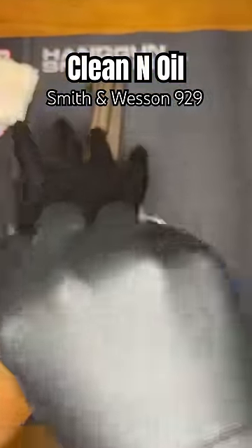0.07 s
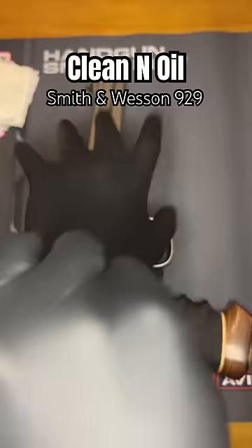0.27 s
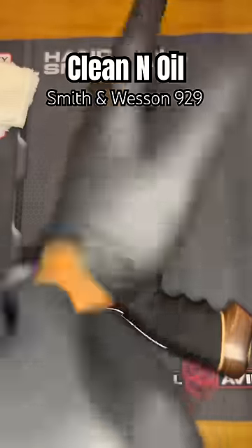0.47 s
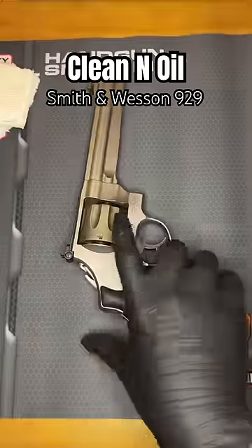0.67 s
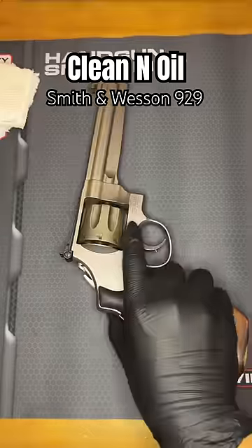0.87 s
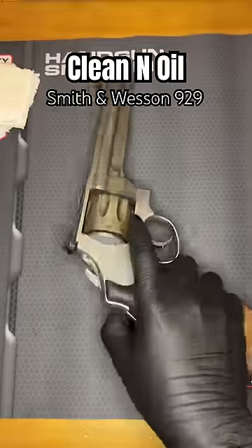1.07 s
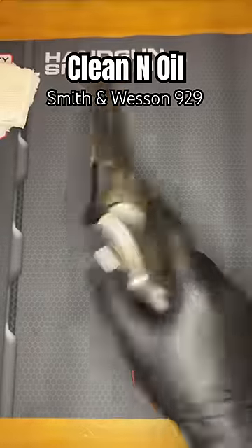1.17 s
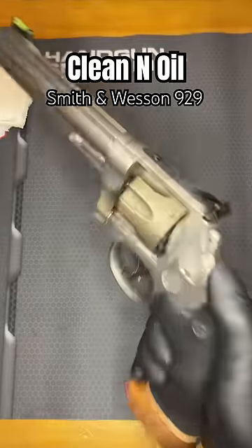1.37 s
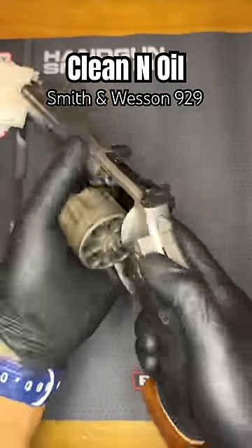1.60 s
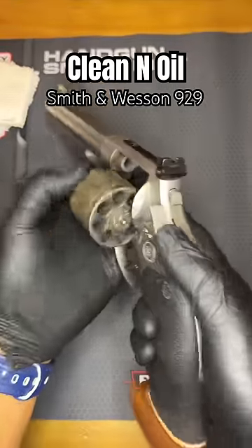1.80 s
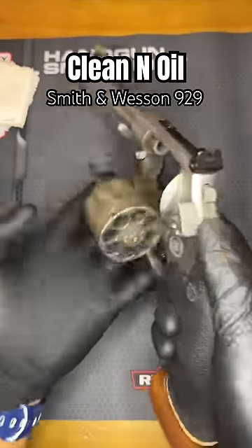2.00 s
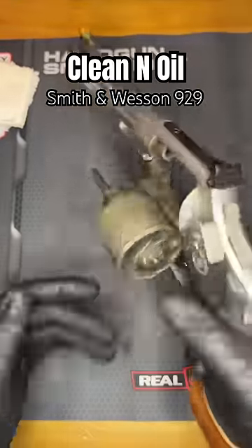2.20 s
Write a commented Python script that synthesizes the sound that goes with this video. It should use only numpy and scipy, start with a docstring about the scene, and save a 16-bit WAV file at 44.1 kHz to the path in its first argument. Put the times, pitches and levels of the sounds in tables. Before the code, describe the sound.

A revolver is opened with sharp metal clicks, close up in a small room. First rubber gloves rustle and snap and something knocks on a mat; after soft handling, the latch clicks and the cylinder clacks open.

```python
"""A steel revolver is opened by gloved hands over a bench mat, close up in a small room.
First the rubber gloves snap, rustle and squeak, something knocks down on the mat, and the sound cuts off.
Then the gun is picked up. Its latch slides and clicks, and the cylinder swings out and clacks
against its stop, ringing briefly. Each click is a cluster of tiny impacts; each rustle is rubber
catching and slipping. A faint rumble lies under it all."""
import sys
import numpy as np
from scipy import signal
from scipy.fft import rfft, irfft
from scipy.io import wavfile

SR = 44100
rng = np.random.default_rng(int(sys.argv[2]) if len(sys.argv) > 2 else 0)


def put_to_file(sound):
    """Save the sound as 16-bit audio at rate SR, in the file named by the first command-line argument."""
    columns = np.atleast_2d(sound).T  # one column per channel
    safe = np.clip(columns, -1, 1)
    whole_steps = np.round(safe * 32767)
    wavfile.write(sys.argv[1], SR, whole_steps.astype(np.int16))


N = 99225
TIME, HZ = np.arange(N) / SR, np.fft.rfftfreq(N, 1 / SR)


def amp(db):
    """Turns decibels into a gain."""
    return 10 ** (np.asarray(db) / 20)


def unit_level(x):
    """Scales a sound to an average (rms) level of 1."""
    return x / np.sqrt(np.mean(x ** 2) + 1e-20)


def burst(x):
    """Gives a short sound the energy of 10 ms at level 1."""
    return x * np.sqrt(SR / 100 / (np.sum(x ** 2) + 1e-20))


def curve(points, hz):
    """Joins a table's points along a log-frequency axis."""
    point_hz, value = np.transpose(points)
    return np.interp(np.log(hz + 1), np.log(point_hz + 1), value)


def add(mix, start_s, sound):
    """Mixes a sound in at its start time."""
    part = mix[max(round(start_s * SR), 0):][:len(sound)]
    part += sound[:len(part)]


def wobble(speed_hz=55.3):
    """A random wavering of level 1, mostly slower than speed_hz."""
    return unit_level(irfft(rfft(rng.standard_normal(N)) * np.exp(-(HZ / speed_hz) ** 2), N))


# Borders of a hit's five bands, low to high (thud, knock, clack, snap, air): edge_hz
HIT_BANDS = [85, 590, 1080, 4600, 9000, 16500]
def band(x, k, edges=HIT_BANDS):
    """Keeps only band k of a sound, counting from 0."""
    edges = np.minimum(edges[k:k + 2], SR / 2 - 1)
    return signal.sosfilt(signal.butter(3, edges, "band", fs=SR, output="sos"), x)


# How alike left and right are in the room (1 is identical): frequency_hz, likeness
STEREO_LIKENESS = [(150, 0.77), (900, 0.14), (14000, 0.83)]
def stereo(noises):
    """Blends two noises into left and right: alike in the bass and high treble, less so between."""
    size = noises.shape[1]
    likeness = np.clip(curve(STEREO_LIKENESS, np.fft.rfftfreq(size, 1 / SR)), 0, 1)
    a, b = rfft(noises)
    mid, side = np.sqrt((1 + likeness) / 2) * a, np.sqrt((1 - likeness) / 2) * b
    return irfft(np.array([mid + side, mid - side]), size)


# Tone of the quiet room: frequency_hz, relative_db
RUMBLE_TONE = [(20, -29.5), (50, -7.5), (85, 2), (140, -15.5), (200, -9), (400, -17.5), (9000, -31),
               (15000, -35)]
def room_tone(level_db=-68.5):
    """A faint low rumble with a little hiss."""
    spectrum = rfft(stereo(rng.standard_normal((2, N)))) * amp(curve(RUMBLE_TONE, HZ))
    return amp(level_db) * unit_level(irfft(spectrum, N))


# Time the echo takes to fade by 60 dB: frequency_hz, fade_s
ECHO_FADE = [(800, 0.29), (3000, 0.6), (9000, 0.32)]
# Tone of the echo: frequency_hz, level_db
ECHO_TONE = [(100, -22.5), (800, -8.5), (3000, -15), (7500, -6.5), (15000, -24.5)]
def room(x, early_db=-15.5, early_decay_s=0.021):
    """Adds quick reflections off the bench and a soft wash of echo from the room."""
    hz, frame_s, noise = signal.stft(stereo(rng.standard_normal((2, SR))), SR, nperseg=256)
    fade = amp(-60 * frame_s / curve(ECHO_FADE, hz)[:, None])
    fade *= amp(curve(ECHO_TONE, hz))[:, None] / np.sqrt(SR * np.mean(fade ** 2, axis=1, keepdims=True))
    tail = signal.istft(noise * fade, SR, nperseg=256)[1][:, :SR]
    t = TIME[:SR]
    bounces = stereo(rng.standard_normal((2, SR)) * (rng.random(SR) < .03))
    early = bounces * np.exp(-t / early_decay_s) * (t > .004)
    echo = tail * np.minimum(t / 0.0028, 1) + amp(early_db) * early / np.linalg.norm(early[0])
    return x + signal.fftconvolve(x[None], echo, axes=1)[:, :N]


def rattle(start_s=.567, length_s=.06, ticks_per_s=85, level_db=-64):
    """A short run of faint ticks that dies away."""
    out, t = np.zeros(N), TIME[:SR // 100]
    for delay_s in np.arange(0, length_s, 1 / ticks_per_s):
        noise = rng.standard_normal(len(t))
        tick = burst(band(noise * np.exp(-t / .0005), 3)) + burst(band(noise * np.exp(-t / .0025), 2))
        jitter_s = rng.random() / ticks_per_s / 2
        add(out, start_s + delay_s + jitter_s, amp(level_db) * np.exp(-delay_s / length_s) * tick)
    return out


# Low notes of the bench under the palm: pitch_hz, level_db
PALM_NOTES = [(100, -49), (235, -50.5), (435, -56)]
def palm(start_s=.727, decay_s=0.02):
    """The hand lands on the gun and the bench answers with a soft, low thud."""
    t = np.maximum(TIME - start_s, 0)
    fade = np.exp(-t / decay_s)
    soft_start = 1 - fade ** 10
    return fade * soft_start * sum(amp(db) * np.sin(2 * np.pi * hz * t) for hz, db in PALM_NOTES)


def thump(start_s=.4338, drop_hz=700, end_hz=15, fall_s=.0021):
    """The mat gives under a heavy knock, so the pitch falls; the bench sounds a little longer."""
    out, t = np.zeros(N), TIME[:SR // 5]
    cycles = np.cumsum(end_hz + drop_hz / (1 + t / fall_s)) / SR
    mat = amp(-24.5) * np.exp(-t / 0.002)
    bench = amp(-29) * np.exp(-t / 0.018)
    add(out, start_s, (mat + bench) * np.sin(2 * np.pi * cycles))
    return out


# Rubber and steel that stick and sing: start_s, length_s, pitch_hz, glide_share, level_db
SQUEAKS = [ (.004, 0.016, 2410, .2, -45), (0.025, 0.012, 552, -0.54, -48), (0.035, 0.0095, 1980, -.25, -45),
           (1.541, 0.016, 7900, -0.14, -43), (1.74, 0.012, 848, -0.057, -52.5),
           (1.804, 0.047, 853, -.04, -46.5), (1.878, 0.019, 867, 0.015, -45.5)]
def squeaks(pitch_wobble=0.076, flutter_db=1.75):
    """Glove, latch and crane (the cylinder's arm) sing unevenly as they slide, gliding in pitch."""
    out = np.zeros(N)
    for start_s, length_s, pitch_hz, glide, level_db in SQUEAKS:
        progress = np.arange(0, length_s, 1 / SR) / length_s
        bend = 1 + glide * (2 * progress - 1) + pitch_wobble * wobble()[:len(progress)]
        cycles = np.cumsum(pitch_hz * bend) / SR
        swell = np.sin(np.pi * progress) ** 2
        add(out, start_s, amp(level_db) * np.sqrt(2) * swell * np.sin(2 * np.pi * cycles))
    return out * amp(flutter_db * wobble())


def grip_hum(rubbing, pitch_hz=197.3, sharpness=24.4, boost_db=12):
    """Rubbing also stirs a dull hum in the held gun."""
    hum = signal.lfilter(*signal.iirpeak(pitch_hz, sharpness, fs=SR), rubbing)
    return rubbing + amp(boost_db) * hum


# Borders of the same five bands for soft rubber: edge_hz
RUB_BANDS = [120, 330, 1650, 2750, 9000, 15500]
# Glove strokes on glove, mat and steel: peak_s, rise_s, fall_s, thud_db, knock_db, clack_db, snap_db
STROKES = [ (.004, 0.051, 0.027, -61, -46.5, -40, -48.5), (0.183, 0.0086, 0.063, -80.5, -71, -58, -57.5),
           (0.297, 0.012, 0.024, -76, -59, -54, -57), (.342, 0.025, 0.12, -76, -68.5, -58.5, -62),
           (0.79, 0.05, 0.05, -62.5, -59, -60, -60), (0.891, 0.0048, 0.059, -65, -75, -62.5, -75.5),
           (1, 0.035, 0.011, -66.5, -68, -61.5, -69), (1.126, 0.066, 0.13, -69, -66, -63, -67),
           (1.477, 0.053, 0.2, -76, -72, -68, -70), (1.549, 0.014, 0.015, -70, -45.5, -42.5, -46.5),
           (1.743, 0.014, 0.12, -88.5, -65, -60.5, -62), (1.88, 0.027, 0.1, -71, -57, -56, -62)]
def glove_rubs(from_s, to_s, grains_per_s=2700, spread_db=3.5, flutter_db=1.75, air_db=-1):
    """Rubber catches and slips in fine grains; plays the strokes that peak between the two times."""
    out, shared_wobble = np.zeros(N), wobble()
    strength = amp(spread_db * np.minimum(rng.exponential(1, N), 4))
    grains = strength * (rng.random(N) < grains_per_s / SR)
    friction = unit_level(grains * rng.choice([-1, 1], N)) + rng.standard_normal(N)
    for k in range(len(RUB_BANDS) - 1):
        power = np.zeros(N)
        for peak_s, rise_s, fall_s, *levels_db in STROKES:
            if from_s <= peak_s < to_s:
                t = TIME - peak_s
                swell = np.exp(-np.where(t < 0, (t / rise_s) ** 2, t / fall_s))
                band_db = [*levels_db, levels_db[-1] + air_db][k]
                power += (amp(band_db) * swell) ** 2
        flutter = amp(flutter_db * (shared_wobble + wobble()))  # rubber grips and lets go unevenly
        out += np.sqrt(power) * unit_level(band(friction, k, RUB_BANDS) * flutter)
    return out


def hits(rows, notes, ring_db, air_db, grit_db=-5):
    """Each hit is a cluster of tiny impacts; the body answers with a knock and the steel rings on."""
    out, t = np.zeros(N), TIME[:SR // 3]
    # The hand damps most of the ring at once; a little lingers.
    damped_s, linger_db, linger_s = 0.0025, -17.5, 0.069
    ring_fade = np.exp(-t / damped_s) + amp(linger_db - 60 * t / linger_s)
    for start_s, rise_s, decay_s, knock_hz, thud_db, knock_db, clack_db, snap_db in rows:
        hit = np.zeros(len(t))
        for k, band_db in enumerate([thud_db, knock_db, clack_db, snap_db, snap_db + air_db]):
            # Thud and knock start later and last longer.
            age_s, fade_s = (t - .0008, decay_s + .001) if k < 2 else (t, decay_s)
            shape = np.clip(age_s / rise_s, 0, 1) ** 2 * np.exp(-np.maximum(age_s - rise_s, 0) / fade_s)
            part = burst(band(shape * rng.choice([-1, 1], len(t)), k))
            if k == 1:  # the knock is a tone with some gritty noise
                no_bass = signal.butter(2, knock_hz / np.sqrt(2), "high", fs=SR)
                tone = signal.lfilter(*no_bass, shape * np.sin(2 * np.pi * knock_hz * age_s))
                part = amp(grit_db) * part + burst(tone)
            hit += amp(band_db) * part
        chord = sum(amp(db) * np.sin(2 * np.pi * (hz * t + rng.random())) for hz, db in notes)
        ring = burst(chord * ring_fade * np.minimum(t / rise_s, 1) ** 2)
        add(out, start_s, hit + amp(clack_db + ring_db) * ring)
    return out


# Ringing notes of the gun lying on the mat: pitch_hz, relative_db
RESTING_GUN_NOTES = [(2260, 4), (2620, 5.5), (3860, 0), (5330, -0.5), (10990, 4.5)]
# Glove snaps and knocks: start_s, rise_s, decay_s, knock_hz, thud_db, knock_db, clack_db, snap_db
SNAPS = [ (.0892, 0.00035, 0.00087, 1500, -60, -49, -47, -47.5),
         (.2369, 0.00019, 0.00073, 720, -70.5, -43, -35.5, -53),
         (.2454, .00018, 0.0024, 690, -62.5, -61.5, -51.5, -53),
         (.420, 0.0022, 0.028, 409, -47.5, -45.5, -44, -49),
         (.4315, 0.001, 0.0021, 622, -34, -33, -30, -31),
         (.4430, 0.0037, 0.0033, 542, -41, -40, -29, -30.5)]
def glove_snaps():
    """Snapping gloves and knocks on the mat set the resting gun ringing faintly."""
    return hits(SNAPS, RESTING_GUN_NOTES, ring_db=-5, air_db=3.5)


# Ringing notes of the opened gun: pitch_hz, relative_db
OPEN_GUN_NOTES = [(798, -7.5), (2760, 2.5), (3070, -1), (3272, 4), (4095, 1.5), (4248, 3.5)]
# Steel striking steel: start_s, rise_s, decay_s, knock_hz, thud_db, knock_db, clack_db, snap_db
CLICKS = [ (.828, 0.002, 0.0045, 448, -60, -58, -80, -76), (.9415, 0.0011, .002, 960, -86, -58, -64, -79),
          (1.156, .001, 0.0023, 620, -59.5, -54.5, -92, -76),
          (1.5200, 0.00026, .003, 945, -82, -54.5, -52, -49),
          (1.5792, 0.00021, .0012, 890, -77.5, -52, -58.5, -52),
          (1.5893, .0006, 0.0039, 690, -57.5, -47, -48, -56.5),
          (1.8070, .0005, .0022, 960, -72, -40, -38.5, -49),
          (1.9106, .0005, .0016, 720, -56, -39, -35, -36),
          (1.9399, 0.00065, 0.00087, 1123, -44.5, -36.5, -36, -30),
          (1.9415, 0.00051, 0.0049, 791, -39.5, -31, -33.5, -42),
          (1.9610, 0.002, 0.0027, 762, -49, -37.5, -36.5, -46.5),
          (1.9728, 0.00032, .0022, 780, -57.5, -46, -47.5, -52)]
def revolver_clicks():
    """Latch and crane click, then the cylinder clacks against its stop and rings briefly."""
    return hits(CLICKS, OPEN_GUN_NOTES, ring_db=-1, air_db=-1.5)


def until(end_s, fade_s=0.0024):
    """Full level up to end_s, where a quick fade cuts the sound off."""
    return np.clip((end_s - TIME) / fade_s + .5, 0, 1)


def scene():
    """The gloves and the knock, then the gun is lifted and opened; each part cuts off, echo and all."""
    hands_end_s, gun_end_s = .541, 2.185
    hands = glove_snaps() + glove_rubs(0, hands_end_s) + thump()
    gun = revolver_clicks() + grip_hum(glove_rubs(hands_end_s, gun_end_s)) + palm() + rattle()
    return room(hands) * until(hands_end_s) + room(gun + squeaks()) * until(gun_end_s) + room_tone()


# Phase lead of left over right: frequency_hz, lead_radians
# The highest treble is nearly opposite in the two channels and sounds wide.
STEREO_PHASE = [(0, 0), (7500, -.35), (9800, -1.2), (12000, -2.6), (16400, -3)]
# How much louder the left channel is: frequency_hz, extra_db
LEFT_EXTRA = [(150, 1), (380, 3.5), (1300, .6)]
def record(dry, dip_hz=4773, dip_width_hz=390, dip_db=-4.5, top_hz=16500):
    """Widens the high treble, leans the sound left, dips one narrow band and cuts the very top."""
    lead = np.interp(HZ, *np.transpose(STEREO_PHASE))
    left = amp(curve(LEFT_EXTRA, HZ) / 2) * np.exp(.5j * lead)  # the right gets the opposite
    dip = amp(dip_db * np.exp(-((HZ - dip_hz) / dip_width_hz) ** 2))
    channels = irfft(rfft(dry) * dip * np.array([left, 1 / left]), N)
    treble_cut = signal.firwin(255, top_hz, window=("kaiser", 9), fs=SR)
    return signal.oaconvolve(channels, treble_cut[None], "same")


dry = scene()
out = record(dry)
put_to_file(out)
```